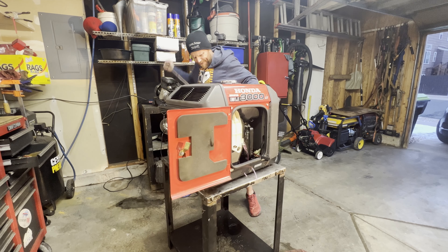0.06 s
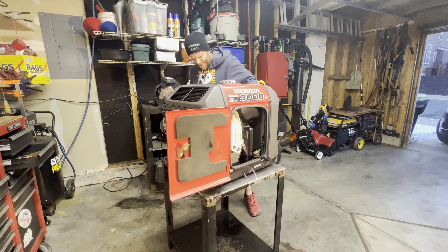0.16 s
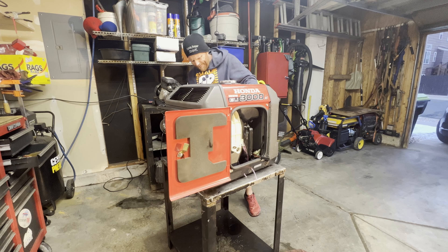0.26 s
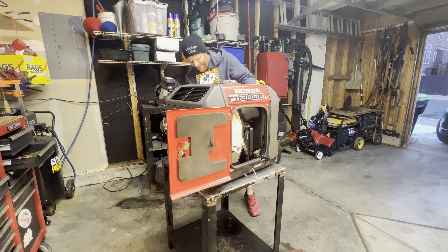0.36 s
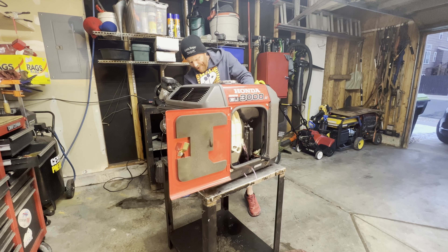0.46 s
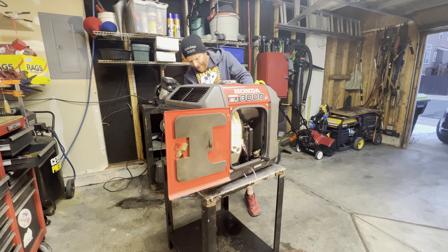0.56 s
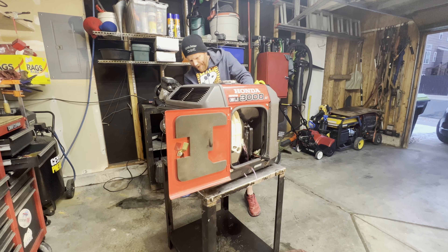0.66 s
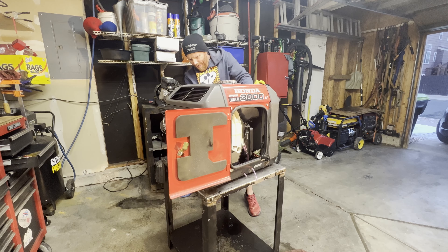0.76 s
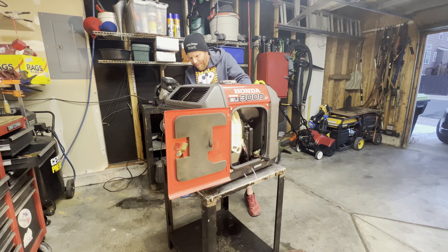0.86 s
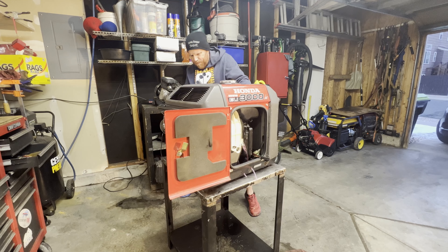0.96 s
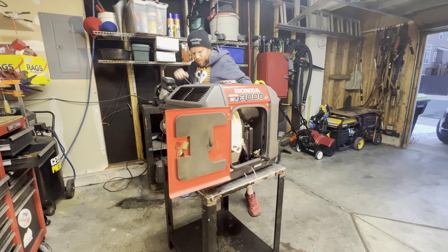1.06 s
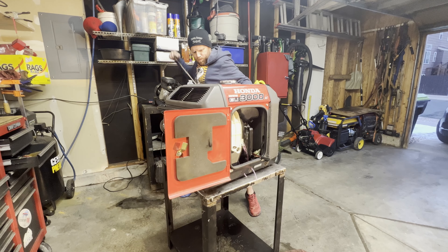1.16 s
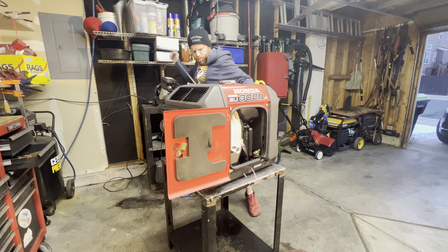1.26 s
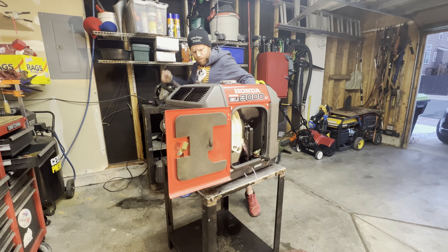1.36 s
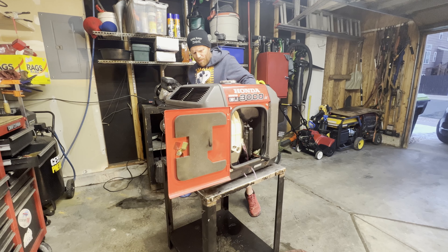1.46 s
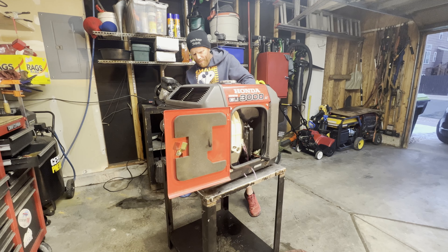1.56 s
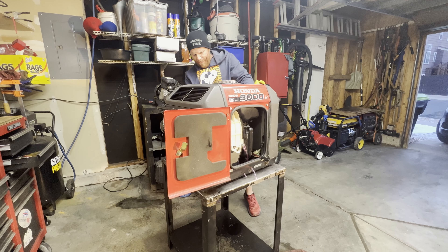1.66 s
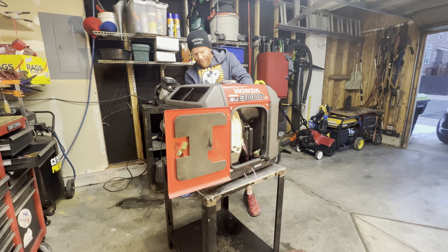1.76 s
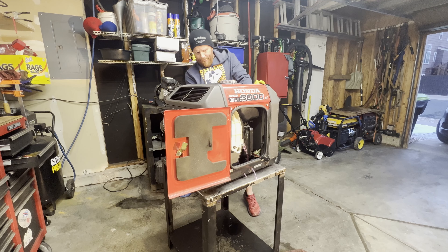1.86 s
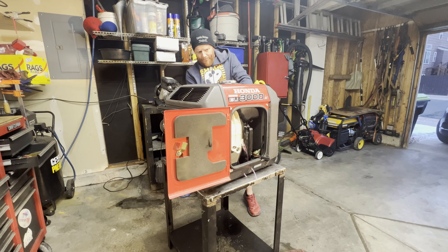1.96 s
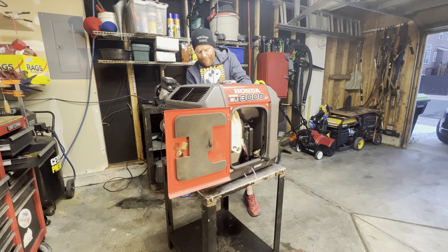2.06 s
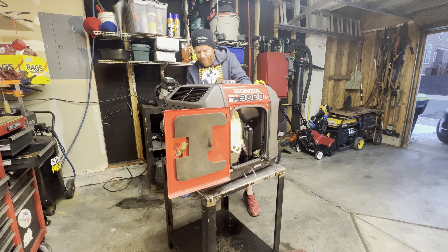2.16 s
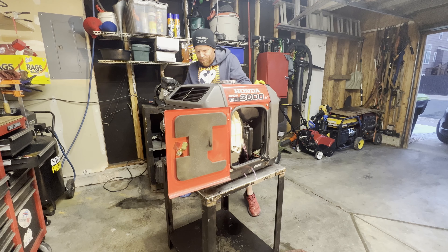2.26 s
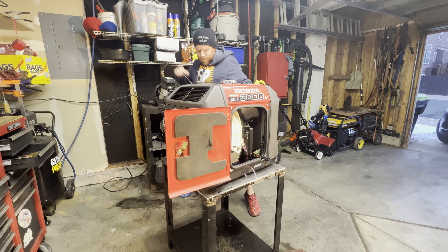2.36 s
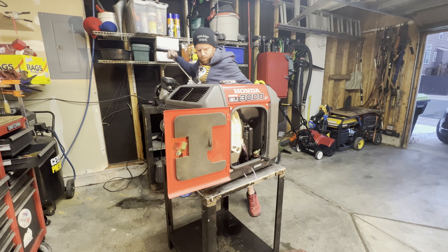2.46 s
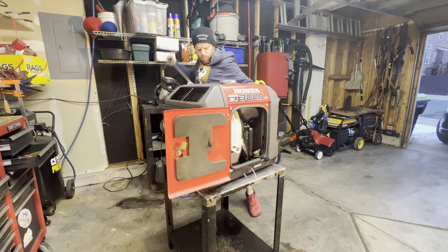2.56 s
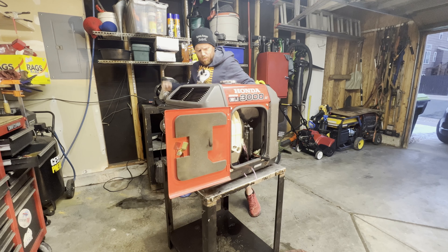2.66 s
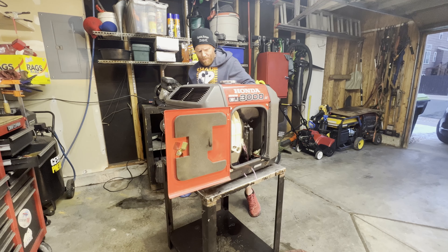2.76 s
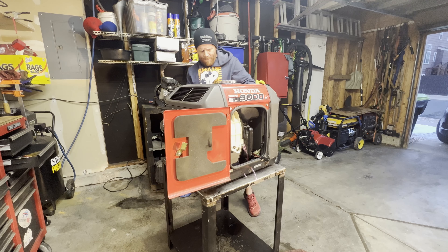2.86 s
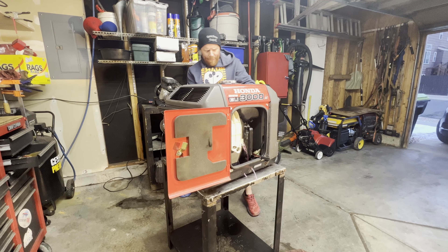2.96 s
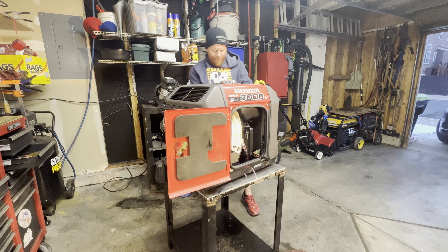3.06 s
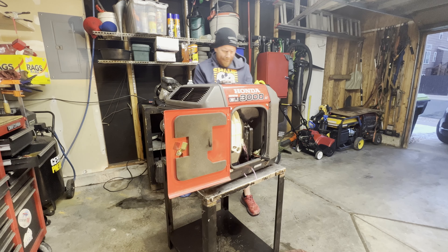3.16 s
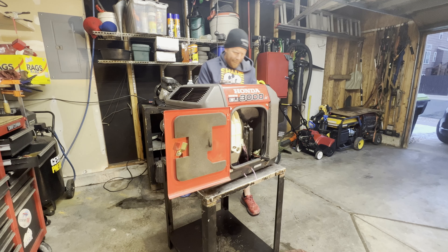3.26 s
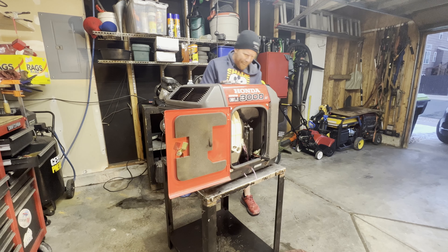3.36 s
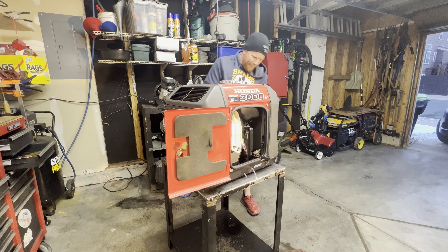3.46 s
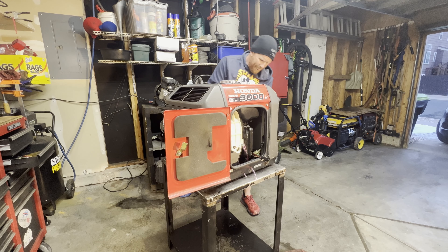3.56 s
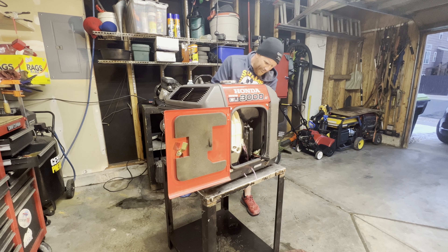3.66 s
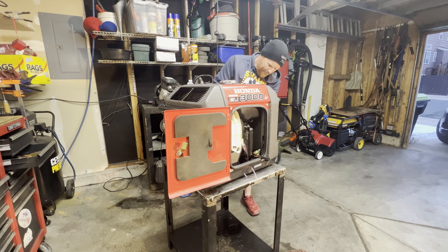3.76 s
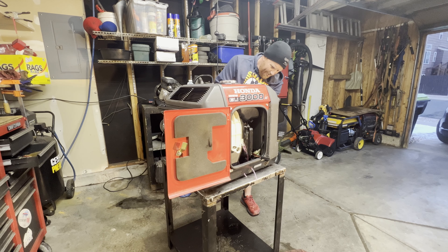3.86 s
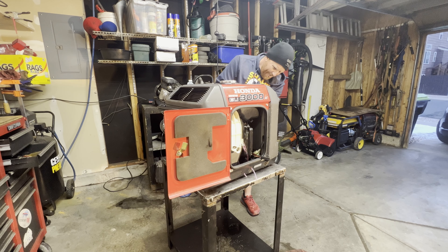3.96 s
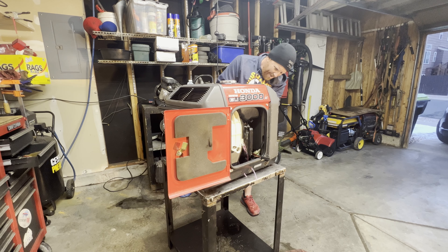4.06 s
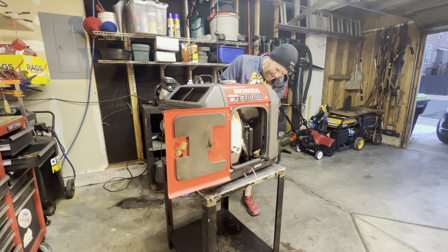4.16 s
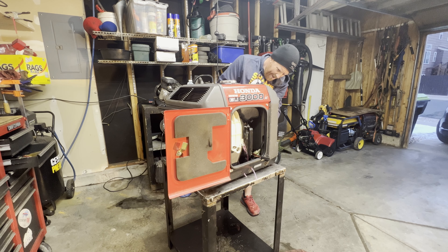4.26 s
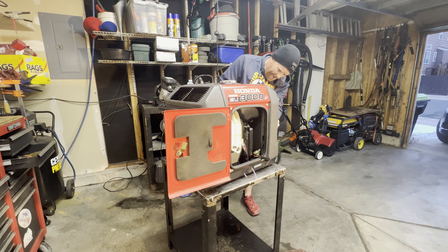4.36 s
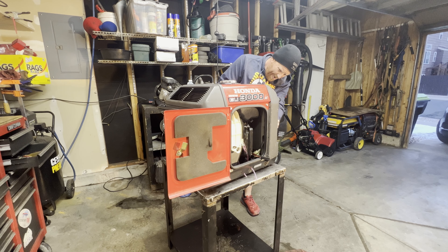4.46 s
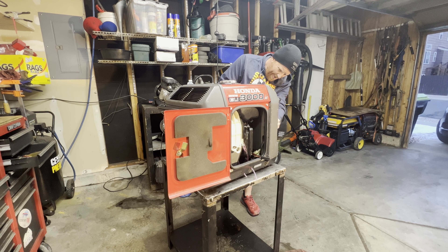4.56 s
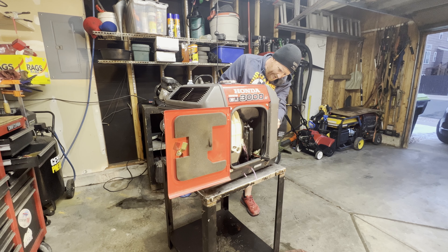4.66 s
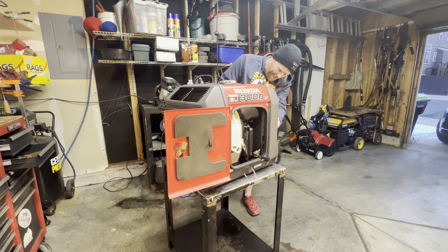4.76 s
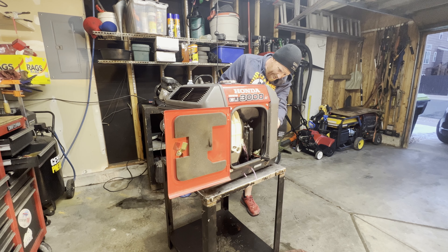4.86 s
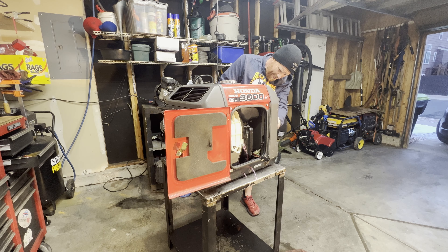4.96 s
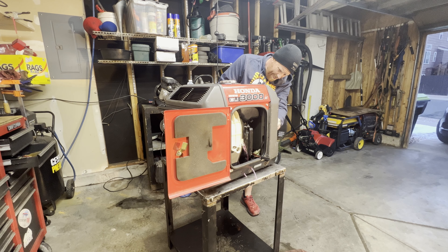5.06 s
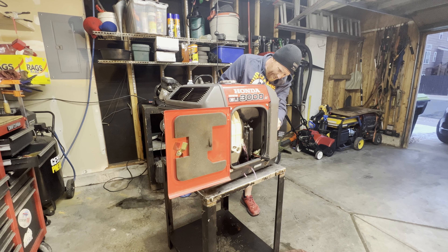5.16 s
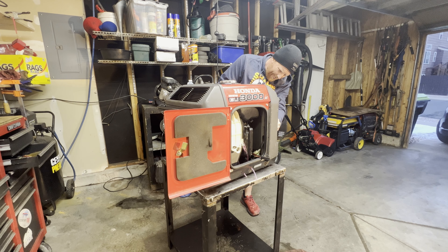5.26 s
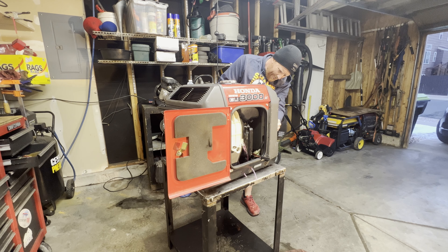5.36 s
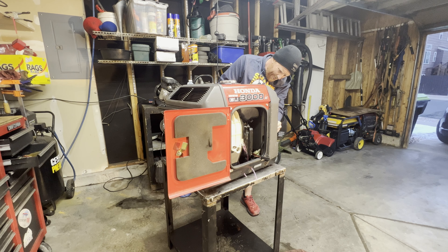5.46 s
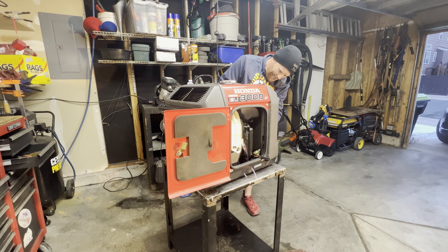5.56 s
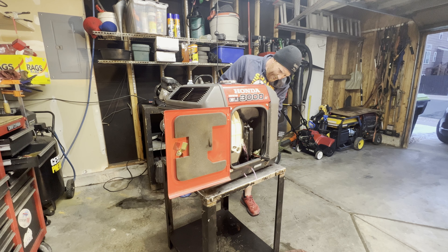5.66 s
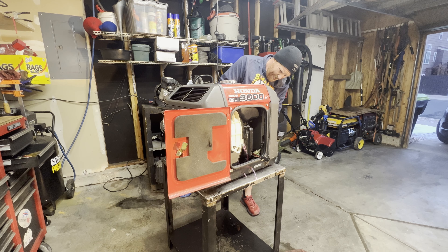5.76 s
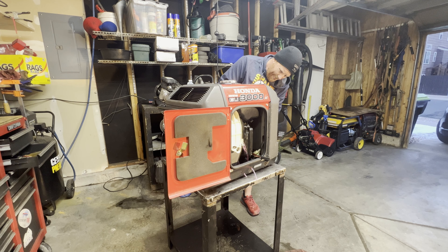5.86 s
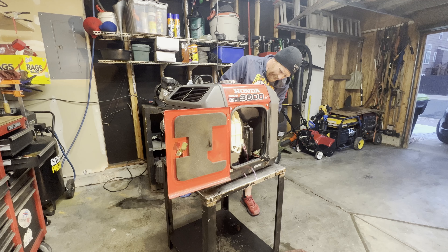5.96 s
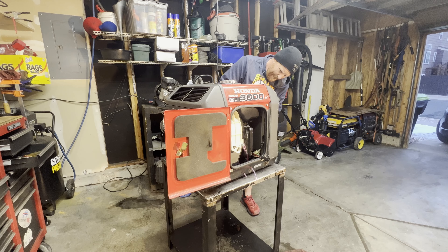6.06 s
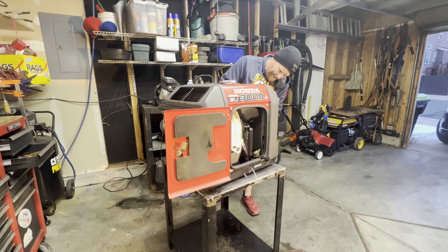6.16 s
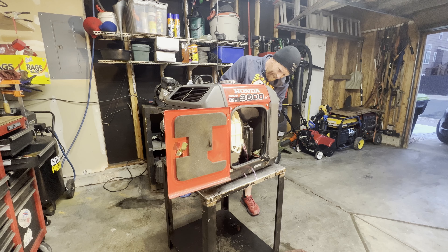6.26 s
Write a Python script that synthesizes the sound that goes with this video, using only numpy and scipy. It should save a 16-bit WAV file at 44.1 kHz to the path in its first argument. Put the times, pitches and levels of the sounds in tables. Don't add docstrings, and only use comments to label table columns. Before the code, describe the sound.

A small generator's pull cord is yanked repeatedly in a workshop; metal scrapes, whirs and clatters, the engine never catches, then near silence.

```python
import sys
import numpy as np
from scipy import signal
from scipy.fft import rfft, irfft, next_fast_len
from scipy.io import wavfile
from scipy.ndimage import uniform_filter1d, map_coordinates

SR = 44100
rng = np.random.default_rng(int(sys.argv[2]) if len(sys.argv) > 2 else 0)


def nominal_scale(level):
    x = np.asarray(level, float) / 20
    return 10 ** x


def unload_wav(signal):
    wavfile.write(
        sys.argv[1],
        SR,
        np.round(np.clip(np.atleast_2d(signal).T, -1, 1) * 32767).astype(np.int16),
    )


N = 277808

# f/Hz, level/dB per Hz
AIR_COLOUR = [(20, -26.5), (50, -8), (90, -10), (140, -17), (330, -25), (620, -31), (1300, -37.5),
              (1860, -31), (2320, -46), (7000, -50), (9000, -48.5), (10800, -59.5), (13500, -53.5),
              (16000, -51)]
# f/Hz, likeness
AIR_ALIKE = [(60, 0.91), (240, 0.36), (950, -0.38), (3770, -0.072), (15000, -0.33)]
# from t/s, until t/s, hum level/dB, drone level/dB
HUM_SWELLS = [
    (0, 3.7, -68, -67),
    (3.75, 4.4, -60, -73),
    (4.8, 5.57, -60, -68.5),
    (5.75, 6.05, -62, -63.5),
    (6.05, 6.33, -54, -69),
]
SWELL_FADE_S, LULL_DB = 0.13, -70.5
# f/Hz, width/Hz, level/dB
DRONE = [(192, 6, 0), (240, 7, -4)]
# f/Hz, time to fall 60 dB/s
ROOM_DECAY = [(100, 0.51), (1000, 0.55), (5000, 0.42), (9000, 0.3), (12000, .15), (14000, 0.038)]
# f/Hz, likeness
ROOM_ALIKE = [(170, 1.0), (350, 0.35), (1000, 0.18)]

# t/s, peak level/dB, f/Hz, width share, time to fall 60 dB/s
TICKS = [(.004, -28, 765, 0.068, 0.3), (.35, -27, 684, 0.14, 0.11), (1.375, -31, 700, 0.12, 0.18),
         (3.495, -45, 558, 0.6, 0.16), (4.93, -58, 357, .08, .12), (3.076, -33.5, 3307, 0.0396, 0.0596),
         (5.089, -60.5, 498.3, 0.16, .22), (1.755, -33.5, 3130, 0.11, 0.095),
         (3.978, -72, 5380, 0.16, 0.11), (3.979, -66, 9850, 0.47, 0.017), (4.026, -69.5, 12020, 0.3, 0.027),
         (4.118, -70.5, 9080, 0.49, 0.019), (4.40, -73.5, 1500, 0.44, 0.23), (4.445, -67, 1100, 0.86, 0.11),
         (4.68, -77.5, 1806, 0.51, 0.18), (4.848, -58.5, 8600, 0.07, 0.25),
         (4.851, -60.5, 2496, 0.41, 0.16), (4.848, -69, 5200, 0.32, 0.12), (4.848, -65, 12780, 0.18, 0.19),
         (5.088, -64.5, 3000, 0.07, 0.057), (4.85, -54, 500, 0.2, 0.08), (5.281, -75, 4250, 0.16, 0.096),
         (5.392, -68.5, 11930, 0.34, .015), (6.02, -78, 5290, 0.1, 0.077)]
# t/s, peak level/dB, f/Hz, width share, time to fall 60 dB/s
LURCHES = [
    (.443, -23, 190, 0.6, 0.12),
    (0.811, -33.5, 140, 0.15, 0.34),
    (2.056, -36.5, 140, 0.15, 0.28),
]
SNAP_DB, SNAP_T60_S = -6.5, 0.006
# f/Hz, likeness
TICKS_ALIKE = [(150, 0.94), (600, 0.34)]

# f/Hz, width/Hz, level/dB
CASING = [(565, 100, -5.5), (765, 19, 0), (880, 84, -3), (1129, 140, 0.5), (1377, 60, 3), (1532, 120, -3.5),
          (1780, 54, 0), (2100, 280, -4.5), (2440, 660, -11.5)]
# f/Hz, width/Hz, level/dB
CART = [(140, 8.9, -2.5), (201.4, 44, -2.5), (244, 75, -2.5), (352.7, 110, -5.5)]
# f/Hz, width/Hz, level/dB
PANEL = [(425, 45, 0), (495, 50, -5)]
# f/Hz, level/dB per Hz
CLACK_COLOUR = [(1290, -26), (2200, -1.5), (7520, -8), (8240, -12.5), (10700, -18.5), (13800, -17.5),
                (16000, -32)]
# t/s, peak level/dB, thud level/dB, clack level/dB, panel ring level/dB
KNOCKS = [(0.3598, -36, -7, -5, -5.5), (0.443, -35.5, 7.5, -8.5, 2.5), (0.7495, -34, -22.5, -26.5, -16),
          (0.8411, -17, -9.5, -7.5, -21), (1.2151, -23.5, -11.5, -6, -4.5),
          (1.3774, -29.5, -11, -2.5, -3.5), (1.756, -29.5, -6.5, -3.5, -14.5),
          (1.9486, -43, -9.5, -7.5, -5.5), (2.0474, -19, -18, -23.5, -23), (2.0944, -19.5, -15, -5.5, -10),
          (2.4314, -26.5, -14, -2.5, -4), (2.4596, -27, -12.5, -19.5, -2.5), (2.9955, -18, -14, -10, -14),
          (3.0067, -17, -12.5, -10.5, -10), (3.0747, -23.5, -16.5, -7, -17.5), (3.155, -35, -12, -10, 3.5),
          (3.2644, -35.5, -45, -12, -11), (3.294, -36, -20, -20, -5), (3.306, -47.5, -12, -22, 8),
          (3.4082, -50, -12, -16, -5), (3.494, -60.5, 14.5, -30.5, 14.5), (4.8463, -47, -4, -9.5, -7)]
# t/s, peak level/dB, thud level/dB
BUMPS = [
    (3.543, -62, 6.5),
    (3.7507, -59, 0.5),
    (4.1194, -73, 3),
    (4.4108, -74, 12),
    (4.4515, -67.5, 6.5),
    (4.69, -69.5, 10.5),
    (5.09, -69.5, 10.5),
    (5.159, -74, 9),
    (5.4194, -74, 1),
]
BUMP_CLACK_DB, BUMP_RING_DB = -21, 1
HOLLOW_DB, HOLLOW_SHARE = -3, 0.096
DULL_HZ = 1200
HARDNESS = 1.7
# f/Hz, likeness
BLOWS_ALIKE = [(180, 1.0), (500, 0.3), (3000, 0.68), (12000, 0.3)]
# t/s, peak level/dB, contact time/ms
CATCHES = [(.8047, -22, 0.12), (0.806, -9.5, 0.32), (0.8085, -11, 0.11), (.8185, -20, 0.24),
           (0.8417, -19.5, 0.27), (0.8468, -18, 0.18), (.8535, -21, 0.26), (.858, -22.5, 0.36),
           (.867, -23.5, .3), (.8805, -22, 0.23), (2.0475, -21.5, 0.11), (2.0489, -15.5, .2),
           (2.0525, -20, 0.16), (2.057, -25, .1), (2.0935, -24.5, 0.17), (2.0965, -16.5, 0.35),
           (2.103, -14.5, 0.27), (2.1135, -19.5, .2), (2.122, -27, 0.23), (2.994, -26, .1),
           (2.9972, -13.5, .25), (3.0065, -19, .35), (3.0098, -21, 0.19), (3.016, -19, 0.29),
           (3.073, -24.5, .15), (3.0905, -23, 0.29), (3.266, -35, 0.083), (3.295, -42, .3),
           (3.409, -44.5, 0.17), (3.495, -45.5, 0.54)]

# t/s, level/dB, f/Hz, length/s
SONGS = [(.005, -28.5, 752, 0.056), (.09, -29, 416, .055), (0.973, -30.5, 344, .09),
         (.995, -30.5, 440, 0.063), (1.075, -31, 516, .06), (1.154, -29, 546, 0.037), (1.21, -28, 436, .05),
         (1.225, -29, 504.3, 0.081), (1.395, -28, 415, .065), (1.455, -36, 350, .04),
         (1.38, -33, 819.6, .06), (2.255, -30, 354, .04), (2.275, -31.5, 793, 0.065),
         (2.305, -30.5, 1155, .055), (2.35, -27, 509, .045), (2.425, -27, 449.5, .04),
         (2.465, -27.5, 498, .035), (2.495, -32, 490, .03), (2.48, -31, 591, 0.062),
         (2.575, -29.5, 510.7, 0.1), (2.69, -30, 431.4, .05), (2.72, -34, 817, .05),
         (2.81, -30.5, 341, .06)]
# t/s, f/Hz, level/dB
WHINE = [
    [(0.0, 494.5, -27), (0.04, 442.3, -37.5), (0.12, 418.8, -36.5), (0.22, 410, -44.5), (0.4, 365, -52.5)],
    [(0.95, 316, -39), (1.03, 438.3, -35), (1.094, 522.7, -36.5), (1.17, 567.6, -35), (1.205, 548, -48),
     (1.25, 511.2, -37.5), (1.368, 441.7, -43.5), (1.44, 410.6, -38.5), (1.51, 358.2, -48.5)],
    [(2.24, 372.4, -43.5), (2.33, 428.5, -36.5), (2.375, 502, -39), (2.42, 558.4, -44), (2.52, 598, -42.5),
     (2.6, 523, -36), (2.72, 441.7, -39), (2.83, 353.3, -40), (2.94, 305, -54.5)],
]
# f/Hz, width/Hz, level/dB
WHINE_BODY = [(355, 30, -2), (442, 29, 0), (514, 51, 0), (593.4, 57, -5)]
BODY_PASS, STRANDS_DB = 0.51, -14
# f/Hz, width/Hz, level/dB
OCTAVE_BODY = [(765.0, 51, 3.5), (1190, 33, -7.5)]

# f/Hz, level/dB per Hz
SCRAPE_COLOUR = [(1200, -12), (2000, -12.5), (3400, -11.5), (4500, -13.5), (6500, -12.5), (8500, -16.5),
                 (10000, -17.5), (10900, -19.5), (12000, -17), (14500, -22), (16000, -25)]
# f/Hz, width/Hz, level/dB
CUP = [(3285, 60, -2), (3510, 110, -4), (5033, 60, -5), (5545, 65, .5), (6000, 150, -5), (7320, 200, -7),
       (8010, 90, 0), (8200, 100, .5), (8420, 220, -1.5), (9750, 450, -7)]
# t/s, effort level/dB
EFFORT = [
    [(0.0, -29), (0.176, -29.5), (0.326, -33.5), (0.404, -38), (0.578, -42), (0.742, -62.5), (0.8, -59)],
    [(0.812, -37.5), (0.848, -29.5), (0.886, -35.5), (1.1, -27), (1.19, -28), (1.376, -31), (1.71, -35),
     (1.93, -44), (2.04, -58.5)],
    [(2.055, -40.5), (2.101, -34), (2.149, -38), (2.313, -30), (2.441, -27.5), (2.62, -28.5),
     (2.917, -32.5), (2.975, -34.5)],
    [(3.007, -30.5), (3.049, -38.5), (3.111, -34), (3.191, -45.5), (3.24, -50.5), (3.291, -55),
     (3.43, -60.5), (3.53, -95)],
]
# from t/s, until t/s
CORD_SLACK = [
    (0.8, 0.78),
    (2.045, 2.25),
]
SLACK_DB, TAKE_UP_S = -14.5, 0.08
STOP_S = 3.03
FULL_DB = -30
CASING_DB, CASING_GROWS = -34.5, 0.96
CART_DB, CART_GROWS = -40, 0.75
THROB_DB, THROB_GROWS = -57.5, 0.25
# t/s, throb level/dB
STROKES = [(.07, -53.5), (.17, -51), (.37, -50), (.47, -41.5), (1.1, -43.5), (1.2, -47.5), (1.36, -46),
           (1.6, -50), (1.79, -46.5), (2.36, -40.5), (2.55, -43.5), (2.661, -49), (3.04, -46)]
STROKE_RISE_S, STROKE_T60_S = 0.048, 0.32
GRAINS_PER_S, GRAINS_DB, GRAIN_SCATTER_DB = 400, -6, 4
# f/Hz, likeness
MACHINE_ALIKE = [(60, 1), (150, .9), (200, .88), (380, .6), (950, 0.095), (2400, 0.52), (6000, 0.27),
                 (15000, 0.53)]
# f/Hz, left over right level/dB
MACHINE_LEAN = [(60, 0.5), (150, 0), (380, -3.5), (950, 1), (2380, -1.5), (5980, 5), (15000, -1)]
# f/Hz, phase/radians
MACHINE_TWIST = [(0, -1), (3270, 0.02), (4390, 2), (6720, -6.5), (7150, -19.5), (8270, -5), (10500, -15.5),
                 (14300, -19), (16400, -18.5)]


def unit(x):
    return x / np.sqrt(np.mean(x ** 2) + 1e-20)


def along(points, hz):
    f, v = np.transpose(points)
    return np.interp(np.log(hz + 1), np.log(f + 1), v)


def curves(rows, after=None):
    s, *cols = np.transpose(rows)
    return [np.interp(np.arange(N) / SR, s, c, right=after) for c in cols]


def wobble(rate):
    coarse = np.arange(0, N + 16, 16)
    knots = rng.standard_normal(int(N * rate / SR) + 4)
    smooth = map_coordinates(knots, [coarse * rate / SR])
    return unit(np.interp(np.arange(N), coarse, smooth))


def between(start, end, fade_s):
    t = np.arange(N) / SR
    return np.clip(np.minimum(t - start, end - t) / fade_s + 0.5, 0, 1)


def filtered(x, response):
    m = next_fast_len(N + SR // 2)
    return irfft(rfft(x, m) * response(np.fft.rfftfreq(m, 1 / SR)), m)[..., :N]


def modes(table, spread=1):
    return lambda f: sum((-1) ** k * nominal_scale(db) * 1j * f * w * spread / (c * c - f * f + 1j * f * w * spread)
                         for k, (c, w, db) in enumerate(table))


def per_noise(response):
    scale = np.sqrt(np.mean(np.abs(response(np.linspace(1, SR / 2, 8000))) ** 2))
    return lambda f: response(f) / scale


def shell(spread, part=slice(None)):
    return lambda f: modes(CASING[part], spread)(f) / (1 + 1j * f / 3000) ** 2 / (1 + 480 / (1j * f + 1)) ** 2


def dull(table):
    return lambda f: modes(table)(f) / (1 + 1j * f / DULL_HZ) ** 3


def grit(spiky_db, rate, patchy_db=2.0):
    z = signal.stft(rng.standard_normal((2, N)), nperseg=256)[2]
    field = uniform_filter1d(rng.standard_normal(z.shape[1:]), size=3, axis=0)
    field = uniform_filter1d(field, size=9, axis=1)
    pair = signal.istft(z * nominal_scale(patchy_db * unit(field)), nperseg=256)[1][:, :N]
    return unit(nominal_scale(spiky_db * wobble(rate)) * pair)


def spread_out(pair, alike):
    turn = lambda hz: np.arccos(np.clip(along(alike, hz), -1, 1)) / 2
    mid, side = filtered(pair, lambda hz: np.array([np.cos(turn(hz)), np.sin(turn(hz))]))
    return np.array([mid + side, mid - side])


def hush():
    swells = np.array([between(a, b, SWELL_FADE_S) for a, b, *_ in HUM_SWELLS])
    lull = nominal_scale([[LULL_DB], [LULL_DB - 9]])
    hum_gain, drone_gain = nominal_scale(np.transpose(HUM_SWELLS)[-2:]) @ swells + lull
    air = unit(filtered(grit(0.21, 49, patchy_db=1.0), lambda f: nominal_scale(along(AIR_COLOUR, f))))
    hum = unit(filtered(rng.standard_normal((2, N)), lambda f: modes([(120, 14, 0)])(f) ** 2))
    drone = unit(filtered(rng.standard_normal((2, N)), lambda f: modes(DRONE)(f) ** 2))
    mix = nominal_scale(-62.5 + 0.795 * wobble(3.3)) * air
    mix += nominal_scale(-3.0 + 1.0 * wobble(6.7)) * hum_gain * hum
    mix += nominal_scale(1.5 * wobble(5.3)) * drone_gain * drone
    return nominal_scale([[-0.8], [0.8]]) * spread_out(mix, AIR_ALIKE)


def shop(x):
    hz, t, z = signal.stft(rng.standard_normal((2, SR // 2)), SR, nperseg=256)
    tail = signal.istft(z * nominal_scale(-60 * t / along(ROOM_DECAY, hz)[:, None]), SR, nperseg=256)[1]
    late = np.pad(x, ((0, 0), (300, 0)))
    return signal.fftconvolve(late, tail / np.linalg.norm(tail[0]), axes=1)[:, :N]


def ticks():
    out, t = np.zeros((2, N + SR)), np.arange(SR // 4) / SR

    def band_noise(edges, shape):
        band = signal.butter(3, np.clip(edges, 0.002, 0.99), "band", output="sos")
        return unit(signal.sosfilt(band, rng.standard_normal(shape)))

    for s, db, hz, share, t60 in TICKS + LURCHES:
        edges = np.clip(hz * (1 + abs(share)) ** np.array([-1, 1]) / (SR / 2), 0.002, 0.99)
        spot = out[:, round(s * SR):][:, :len(t)]
        puff = band_noise(edges, (2, len(t)))
        spot += nominal_scale(db + 1.0 - 60 * t / abs(t60)) * puff * (1 - np.exp(-t * hz))
        click = band_noise(edges * [0.4, 2.5], len(t))
        spot += nominal_scale(db + SNAP_DB - 60 * t / SNAP_T60_S) * click
    return out[:, :N]


def bursts(rows, rise_s, tail_db, longer):
    out, t = np.zeros((2, N + SR)), np.arange(SR // 2) / SR
    for s, db, t60 in rows:
        decay = nominal_scale(-60 * t / t60) + nominal_scale(tail_db - 60 * t / (longer * t60))
        out[:, round(s * SR):][:, :len(t)] += nominal_scale(db) * (1 - np.exp(-t / rise_s)) * decay
    return out[:, :N] * grit(1.0, 300, patchy_db=1.5)


def knocks():
    bumps = [(*row, BUMP_CLACK_DB, BUMP_RING_DB) for row in BUMPS]
    s, db, thud, clack, ring = np.transpose(KNOCKS + bumps)
    hollow = HOLLOW_DB + HOLLOW_SHARE * thud
    low, high = slice(None, 3), slice(3, None)
    clack_body = lambda f: nominal_scale(along(CLACK_COLOUR, f)) / (1 + (f / 9500) ** 8)
    parts = [(db - 9.5, 0.06, -8, shell(1.8, high)),
             (db + hollow - 3.0, 0.055, -8, shell(1.0, low)),
             (db + thud - 1.5, 0.09, -8, dull(CART)),
             (db + ring + 2.5, 0.045, -9, dull(PANEL)),
             (db + clack, 0.06, -12, clack_body),
             (HARDNESS * (db + clack) + 14.5, 0.04, -16, modes([(12700, 2600, 0)]))]
    blows = np.zeros((2, N))
    for level, t60, tail_db, body in parts:
        rows = [(a, b, t60) for a, b in zip(s, level)]
        burst = bursts(rows, rise_s=0.0012, tail_db=tail_db, longer=2.7)
        blows += filtered(burst, per_noise(body))
    return spread_out(blows, BLOWS_ALIKE)


def catches():
    push = np.zeros(N)
    for s, db, contact_ms in CATCHES:
        progress = (np.arange(64) + 0.5) / (abs(contact_ms) * SR / 1000)
        pulse = np.sin(np.pi * np.clip(progress, 0, 1)) + 1e-9
        push[round(s * SR):][:len(pulse)] += nominal_scale(db + 18) * pulse / pulse.sum()
    blunt = lambda f: shell(spread=4.2)(f) / (1 + 1j * f / 3200) ** 2
    return filtered(push, per_noise(blunt)) * np.ones((2, 1))


def songs():
    out = np.zeros((2, N + SR))
    for s, db, hz, length in SONGS:
        t = np.arange(round(length * SR)) / SR
        tone = np.sin(2 * np.pi * hz * t + [[0], [1.1]])
        out[:, round(s * SR):][:, :len(t)] += nominal_scale(db) * np.sin(np.pi * t / length) ** 2 * tone
    return nominal_scale(-2.5 + 1.6 * wobble(70)) * out[:, :N]


def whine():
    t, out, octave = np.arange(N) / SR, np.zeros((2, N)), np.zeros(N)
    strands = unit(filtered(rng.standard_normal(N), lambda f: modes(WHINE_BODY)(f) ** 2))
    for rows in WHINE:
        pitch_hz, level_db = curves(rows)
        fade = np.clip(np.minimum(t - rows[0][0] + 0.0146, rows[-1][0] - t) / 0.05, 0, 1)
        turn = 2 * np.pi * np.cumsum(pitch_hz * (1 + 0.016 * wobble(60))) / SR
        drift = 0.27 * wobble(9)
        uneven = nominal_scale(2.5 * wobble(22) + 1.8 * np.array([wobble(130), wobble(130)]))
        tone = np.sin([turn, turn + 0.76 + drift]) + nominal_scale(STRANDS_DB) * strands
        out += fade * nominal_scale(level_db + 2.5) * uneven * tone
        octave += fade * nominal_scale(level_db - 0.5 + 0.83 * wobble(40)) * np.sin(2 * turn)
    caught = filtered(out, lambda f: BODY_PASS + np.abs(modes(WHINE_BODY)(f)))
    return caught + filtered(octave, modes(OCTAVE_BODY))


def ratchet():
    hit = rng.random((2, N)) < GRAINS_PER_S / SR
    size_db = GRAIN_SCATTER_DB * np.minimum(rng.exponential(size=(2, N)), 2)
    return unit(hit * nominal_scale(size_db) * np.sign(rng.standard_normal((2, N))))


def strokes():
    out, t = np.zeros(N + SR), np.arange(SR // 2) / SR
    for s, db in STROKES:
        swell = nominal_scale(db - 60 * t / STROKE_T60_S) * (1 - np.exp(-t / STROKE_RISE_S)) * 3
        out[max(round((s - STROKE_RISE_S) * SR), 0):][:len(t)] += swell
    return out[:N]


def spin():
    t = np.arange(N) / SR
    effort_db, = curves(np.vstack(EFFORT), after=-160)
    slack_db = SLACK_DB * sum((t > a) * np.clip((b - t) / TAKE_UP_S, 0, 1) for a, b in CORD_SLACK)
    shake_db = effort_db - FULL_DB + slack_db
    rest_s = np.maximum(t - STOP_S, 0)
    flutter = wobble(12)

    rub = grit(0.67, 300) + nominal_scale(GRAINS_DB) * ratchet()
    hiss = unit(filtered(rub, lambda f: nominal_scale(along(SCRAPE_COLOUR, f))))
    cup = lambda f: modes(CUP, spread=1.4)(f) ** 2
    ring = unit(filtered(grit(0.76, 110, patchy_db=-0.4), cup))
    scrape = unit(hiss + nominal_scale(-2 + 1.3 * wobble(25)) * ring)
    scrape = nominal_scale(effort_db - 40 * rest_s + 0.88 * flutter) * scrape
    dulled = filtered(scrape, lambda f: 1 / (1 + (f / 9000) ** 6))
    scrape = dulled + (scrape - dulled) * nominal_scale(-120 * rest_s)

    casing_db = CASING_DB + CASING_GROWS * shake_db + 0.68 * flutter + 0.71 * wobble(30)
    casing = nominal_scale(casing_db) * unit(filtered(grit(0.94, 150), shell(spread=0.95)))
    cart_db = CART_DB + CART_GROWS * shake_db + 0.9 * wobble(15)
    cart = nominal_scale(cart_db) * unit(filtered(grit(2.0, 60), modes(CART + PANEL, spread=1.5)))
    throb_gain = nominal_scale(THROB_DB + THROB_GROWS * shake_db) + strokes()
    throb = throb_gain * unit(filtered(grit(1.3, 7.7), lambda f: modes([(69, 26, 0)])(f) ** 2))
    return spread_out(scrape + casing + cart + throb, MACHINE_ALIKE)


def scene():
    hits = knocks() + catches() + spread_out(ticks(), TICKS_ALIKE) + whine() + songs()
    machine = spin() + hits + nominal_scale(-5.0) * spread_out(shop(hits), ROOM_ALIKE)
    halves = [0.5, -0.5]
    lean = lambda f: nominal_scale(np.outer(halves, along(MACHINE_LEAN, f)))
    twist = lambda f: np.exp(1j * np.outer(halves, along(MACHINE_TWIST, f)))
    return filtered(machine, lambda f: lean(f) * twist(f)) + hush()


def band_limit(x):
    return signal.sosfilt(signal.butter(12, 16830, fs=SR, output="sos"), x)


def record(dry):
    heard = filtered(dry, lambda f: (f < 15900) / (1 + (38 / (f + 1)) ** 3))
    return band_limit(heard)


dry = scene()
out = record(dry)
unload_wav(out)
```